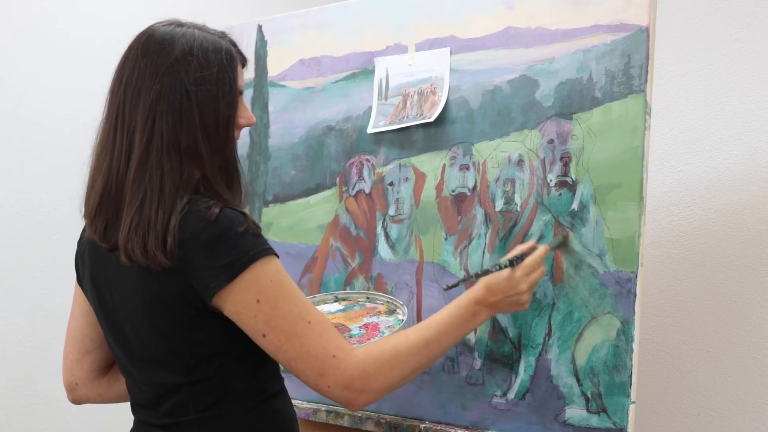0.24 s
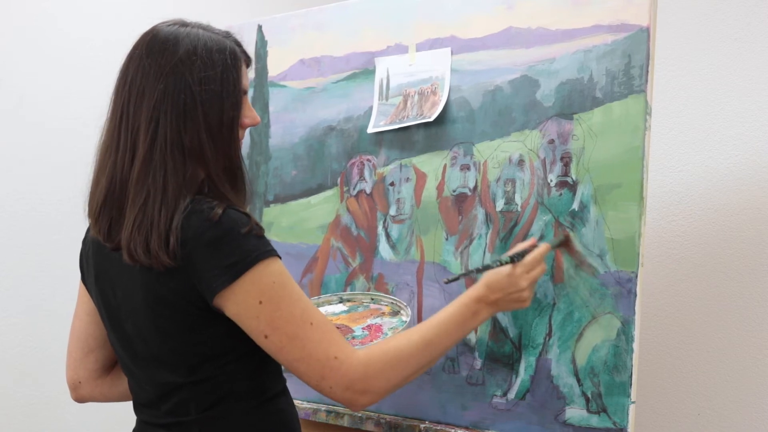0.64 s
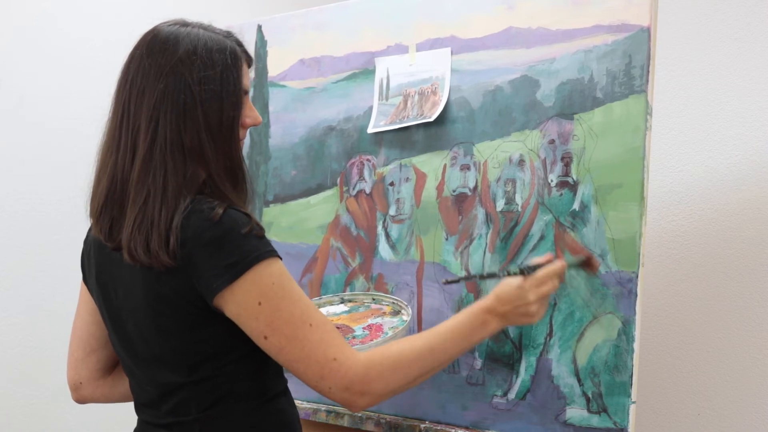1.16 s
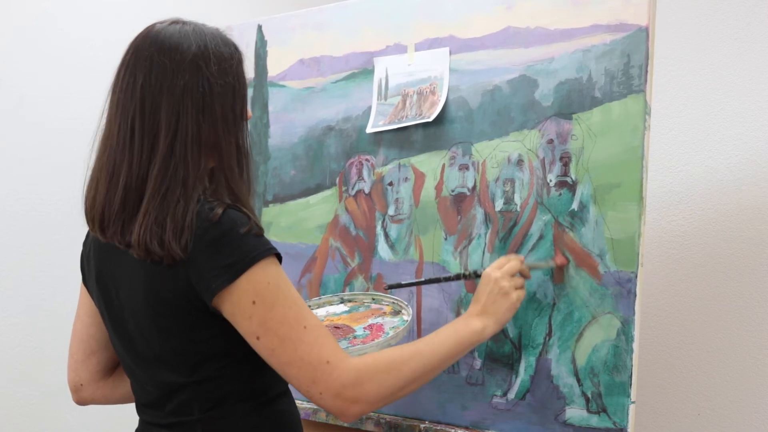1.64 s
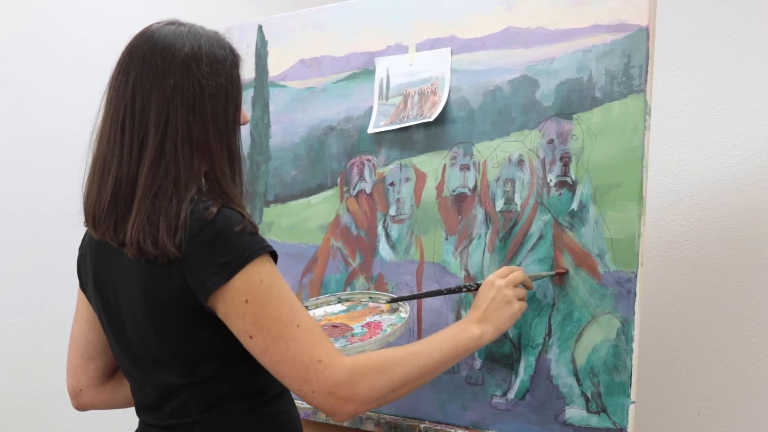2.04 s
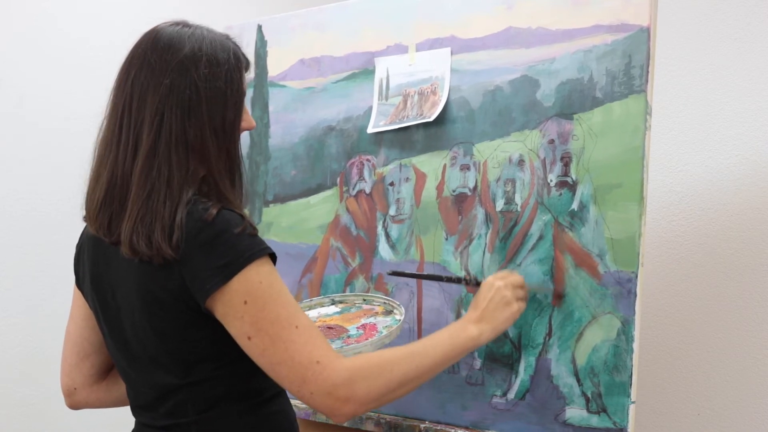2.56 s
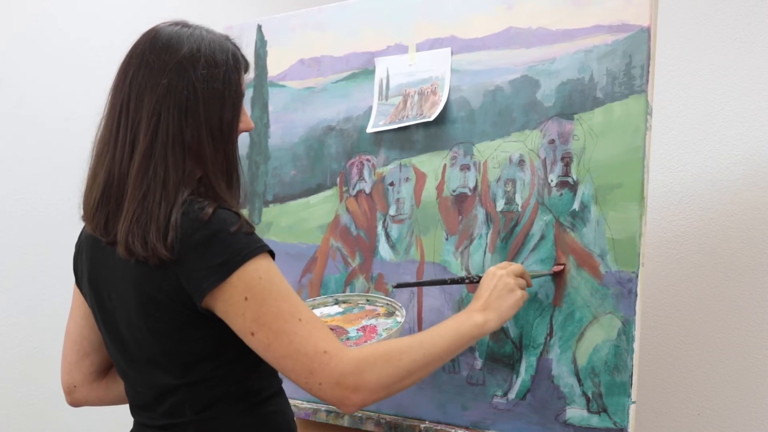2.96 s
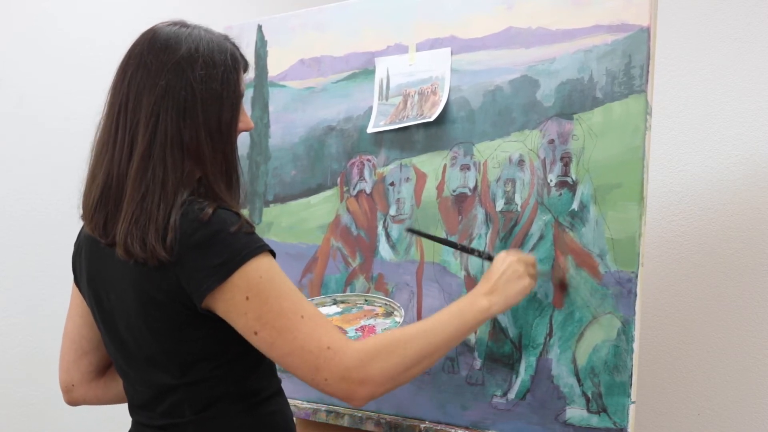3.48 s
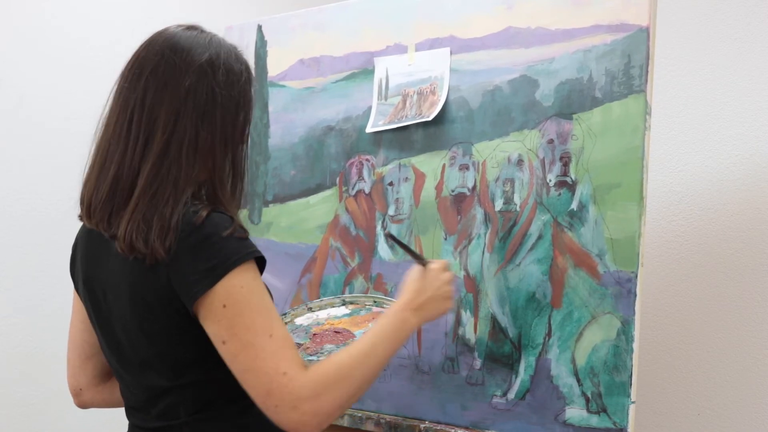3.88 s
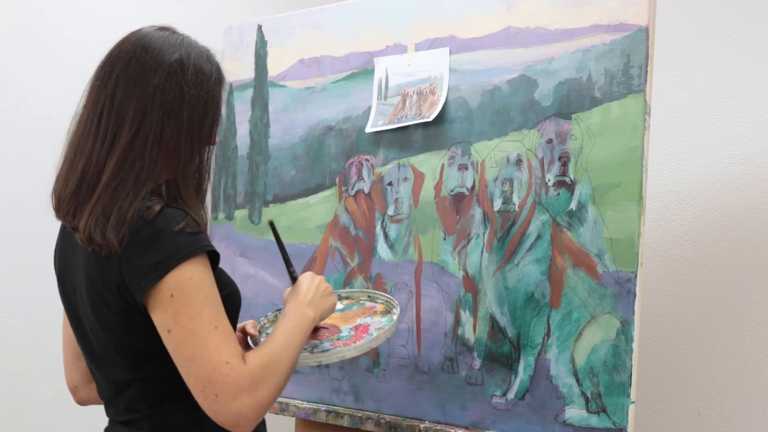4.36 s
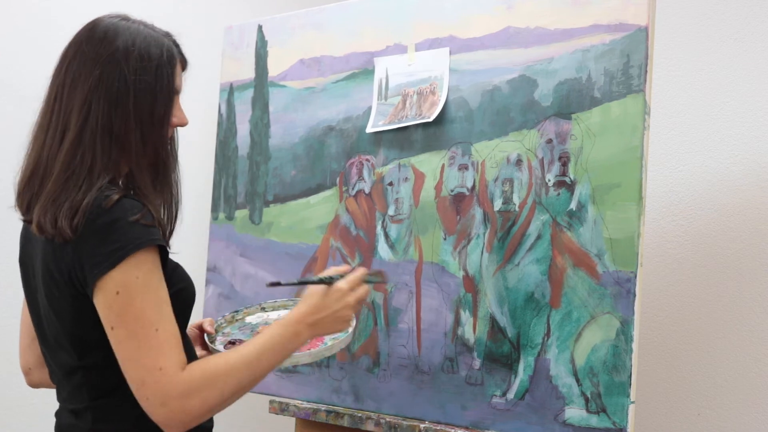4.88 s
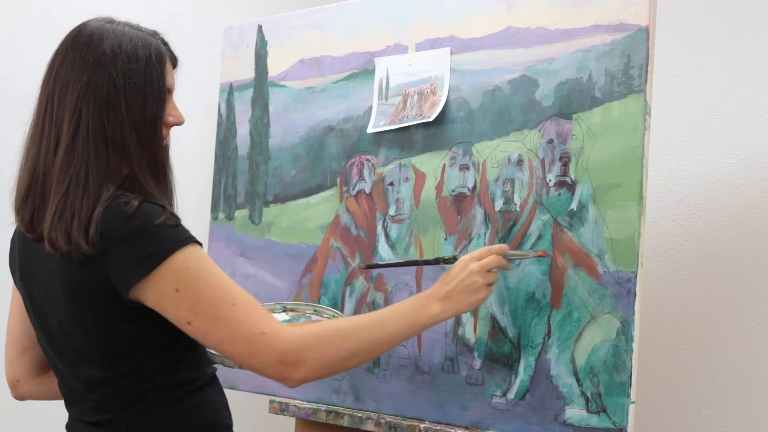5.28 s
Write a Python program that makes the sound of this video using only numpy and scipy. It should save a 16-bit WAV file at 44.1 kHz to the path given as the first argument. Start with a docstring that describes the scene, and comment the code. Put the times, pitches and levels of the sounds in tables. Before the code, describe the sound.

A paintbrush rubs over a stretched canvas in quick, uneven strokes. The bristles hiss and sometimes rasp, while the canvas hums and thumps softly like a slack drum where they land. The strokes stop, clothes rustle faintly, and the brush dabs sticky paint on a palette. A few handle ticks and one last stroke follow. The microphone is close, in a small, quiet studio with low rumble.

```python
"""Bristles hiss in short strokes over a stretched canvas, close to one microphone in a small, quiet studio.
They catch and slip on the weave; the canvas hums under them and thumps like a slack drum where they land.
The brush then dabs sticky paint on a hand-held palette and goes back for one more stroke.
Its handle ticks and clothes rustle as the arm moves, over low room rumble and faint microphone hiss."""
import sys
import numpy as np
from scipy import signal
from scipy.fft import rfft, irfft
from scipy.io import wavfile

SR = 44100
rng = np.random.default_rng(int(sys.argv[2]) if len(sys.argv) > 2 else 0)


def wav_out(sig):
    """Save sig, one row per channel (or a flat mono array), as 16-bit PCM at SR to the path in sys.argv[1]."""
    wavfile.write(sys.argv[1], SR, np.round(np.clip(np.atleast_2d(sig).T, -1, 1) * 32767).astype(np.int16))


N = 243431
TIME = np.arange(N) / SR

# pushes of the brush: start_s, length_s, fastest_point (0-1), peakedness, hiss_db, hum_db, drum_db
BRUSH_STROKES = [(0.0, 0.073, 0.9, 1.3, -56.5, -84, -65), (0.113, 0.065, 0.66, 1.2, -50, -47, -50),
                 (0.167, 0.085, 0.23, .7, -54, -54, -51), (0.245, 0.14, 0.07, 0.57, -51, -47, -49),
                 (0.304, 0.16, 0.44, 1.1, -47, -59, -54), (0.445, 0.045, .5, 1.05, -54, -51.5, -64),
                 (0.543, 0.026, 0.34, 1.2, -54.5, -51, -60), (0.595, 0.26, 0.66, 1.03, -50, -50, -47),
                 (0.879, 0.17, 0.4, 0.93, -46.5, -54, -55), (1.012, 0.041, 0.74, 1.5, -55, -47, -50),
                 (1.054, 0.28, 0.47, 0.83, -48.5, -51, -48), (1.309, 0.099, 0.63, 0.59, -51.5, -60, -63),
                 (1.386, 0.12, 0.47, 1.2, -48.5, -52.5, -55), (1.507, 0.11, .68, 0.66, -51.5, -59, -60),
                 (1.647, 0.16, 0.35, 0.71, -50, -53.5, -54), (1.796, 0.12, 0.6, 0.81, -53.5, -61, -57.5),
                 (1.977, 0.16, 0.2, .7, -55.5, -60, -56), (2.129, 0.17, 0.66, 1.1, -52, -52.5, -55.5),
                 (2.289, 0.24, 0.66, 0.63, -49.5, -51, -46.5), (2.529, 0.14, 0.63, 0.66, -50.5, -59.5, -58),
                 (2.639, 0.072, 0.54, 0.58, -50, -52.5, -56), (2.725, 0.12, 0.47, 1, -56, -54.5, -60),
                 (2.826, 0.25, 0.83, .6, -65, -62, -55), (3.183, 0.25, 0.75, 1.7, -52.5, -50, -45.5),
                 (3.467, 0.14, .36, 0.76, -47, -50.5, -45), (3.616, 0.11, 0.45, 1.1, -47.5, -57.5, -53.5),
                 (5.461, 0.071, 0.36, 1.1, -56, -49, -47.5)]
# spectrum of bristles flicking over the weave: frequency_hz, density_db
BRISTLE_SPECTRUM = [(300, -6), (1000, 0.5), (1400, -4.5), (1750, -0.5), (2000, -2.5), (2400, 1.5),
                    (3300, -4.5), (4200, -2.5), (4900, -1.5), (5500, -5.5), (6300, -3), (7200, -5.5),
                    (10500, -5), (16000, -16)]
# spectrum of the canvas around the brush: frequency_hz, density_db
HUM_SPECTRUM = [(200, -16), (400, -10.5), (500, 0.5), (570, 2), (700, -7), (1000, -10.5), (1400, -35),
                (3000, -31.5)]
# spectrum of the whole canvas as a drum: frequency_hz, density_db
DRUM_SPECTRUM = [(50, -2.5), (140, -8.5), (190, -2), (230, 1.5), (280, -4), (380, -12), (700, -37)]
# stiff bristles chattering: start_s, end_s, pitch_hz, level_db
BRISTLE_RASPS = [(0, 0.082, 6450, -64.5), (0.326, 0.407, 2520, -58), (0.347, 0.424, 6100, -56.5),
                 (0.622, 1.35, 6530, -65), (1.535, 1.617, 4120, -58.5), (1.666, 1.76, 4030, -55),
                 (1.8, 1.9, 3920, -63), (2.638, 2.706, 2830, -62), (3.486, 3.566, 4500, -54),
                 (3.498, 3.582, 6300, -56)]
# course of the low room rumble: time_s, level_db
RUMBLE_LEVELS = [(0, -57.5), (.7, -53.5), (1.6, -51), (2.2, -55), (2.6, -48.5), (3.2, -50), (3.8, -50.5),
                 (4.9, -53.5), (5.25, -49), (5.52, -44)]
# spectrum of that rumble: frequency_hz, density_db
RUMBLE_SPECTRUM = [(15, -6.5), (28, -9.5), (37, 5.5), (50, -10), (70, -10.5), (100, -13.5), (150, -20.5),
                   (260, -26), (600, -51)]
# spectrum of room air and microphone hiss: frequency_hz, density_db
AIR_SPECTRUM = [(100, -4), (300, -9), (500, -7.5), (900, -7.5), (1400, -11.5), (2300, -11), (4000, -18),
                (8000, -21.5), (12300, -22.5), (13200, -15.5), (14100, -19), (14600, -24), (16000, -28)]
# reverberation of the studio: frequency_hz, t60_s
STUDIO_DECAY = [(100, 0.64), (500, 0.64), (2000, 0.58), (10000, 0.15)]
# the brush lands on the canvas: time_s, blow_db, contact_ms, snap_db
CANVAS_LANDINGS = [(.2512, -22, 0.56, -36), (.467, -34, 2.7, -65), (.9043, -36.5, 0.46, -39.5),
                   (.9085, -21, 5.5, -60), (1.674, -22, 5.7, -57), (2.577, -21.5, 2.9, -51),
                   (3.485, -42, 0.66, -39.5), (3.488, -15, 1.84, -58), (3.4925, -23, 2.9, -60),
                   (3.648, -24, 3.55, -62)]
# modes of the canvas on its frame: pitch_hz, gain_db, t60_s
CANVAS_RESONANCES = [(37.8, -18.5, 0.25), (63, -9, 0.096), (96, -9.5, 0.046), (192, -5, 0.041),
                     (232, 3.5, 0.04), (294, -1, 0.013), (525, 3.5, 0.024), (603, -28, 0.059),
                     (742, -4, 0.038), (896, -1.5, 0.032)]
# ticks of the brush handle: time_s, level_db
HANDLE_TICKS = [(.547, -36), (5.247, -33), (5.4095, -30.5), (5.5, -32)]
# moves of the arm: start_s, length_s, rustle_db
ARM_MOVES = [(2.702, 0.56, -64.5), (3.729, 0.15, -65), (3.87, 0.25, -67), (4.044, 0.17, -60.5),
             (4.689, 0.22, -64), (5.08, 0.5, -56.5)]
# spectrum of rubbing cloth: frequency_hz, density_db
CLOTH_SPECTRUM = [(71, -41), (120, -11), (396, -0.5), (561, -10), (961, -7), (1620, -17), (2040, -13),
                  (3000, -25), (3360, -19), (12000, -51), (15600, -68), (22000, -120)]
# the brush knocks on the palette: time_s, blow_db, contact_ms, snap_db
PALETTE_DABS = [(4.1668, -44, 0.22, -45), (4.1757, -37, 0.21, -47.5), (4.1817, -29, 0.57, -56),
                (4.1857, -53, 1, -59), (4.386, -46.5, 0.46, -46), (4.3925, -35, 0.93, -44),
                (4.557, -19, 0.68, -40.5)]
# modes of the palette: pitch_hz, gain_db, t60_s
PALETTE_RESONANCES = [(48, -14, 0.22), (101, -2, 0.048), (165, -9, 0.066), (511.5, 6, 0.044),
                      (616, -20, 0.22), (692, -33, 0.31), (739, 1.5, 0.054), (800, -24, 0.48),
                      (1276, -6, 0.039), (1920, 5.5, 0.02), (2045, 4.5, 0.017), (3610, 7.5, .034),
                      (5100, -1, 0.05)]
# bristles work the paint on the palette: start_s, length_s, squelch_db
PAINT_MIXING = [(4.167, 0.166, -46.5), (4.387, 0.11, -49.5), (4.553, 0.104, -52.5)]
# spectrum of wet paint: frequency_hz, density_db
PAINT_SPECTRUM = [(200, 5), (500, 11), (1050, 4.5), (1500, 6.5), (2200, 3.5), (4000, -1), (5800, -1),
                  (7500, 1), (10000, 0), (13000, -7.5), (16000, -4.5)]
# threads of paint snap: time_s, level_db, band_hz
THREAD_SNAPS = [(4.247, -30, 11000), (4.271, -37, 9500), (4.275, -35, 9000), (4.315, -39, 8000),
                (4.41, -37, 6000), (4.4395, -47, 9000), (4.464, -32.5, 7500), (4.49, -40, 9100),
                (4.576, -34.5, 12000), (4.6477, -42, 11100)]


def gain_of(db):
    return 10 ** (np.asarray(db) / 20)


def unit_rms(x):
    return x / np.sqrt(np.mean(x ** 2) + 1e-20)


def value_at(points, hz):
    """Reads a table on a log-frequency axis."""
    table_hz, values = np.transpose(points)
    return np.interp(np.log(hz + 1), np.log(table_hz + 1), values)


def add(mix, start_s, sound):
    part = mix[max(round(start_s * SR), 0):][:len(sound)]
    part += sound[:len(part)]


def coloured(x, spectrum):
    """Filters x by a spectrum and scales it to rms 1."""
    hz = np.fft.rfftfreq(len(x), 1 / SR)
    return unit_rms(irfft(rfft(x) * gain_of(value_at(spectrum, hz)), len(x)))


def band(x, low_hz, high_hz):
    sos = signal.butter(2, [low_hz, min(high_hz, SR / 2 - 100)], "band", fs=SR, output="sos")
    return signal.sosfilt(sos, x)


def grains(count, per_s, spread_db):
    """Random tiny impulses of uneven size, at rms 1."""
    size = gain_of(spread_db * np.minimum(rng.exponential(1, count), 4))
    return unit_rms(size * rng.choice([-1, 1], count) * (rng.random(count) < per_s / SR))


def flutter(count, hz, depth_db):
    """A factor near 1 that wavers at rates up to hz, repeating each second."""
    slow = rfft(rng.standard_normal(SR)) / (1 + (np.fft.rfftfreq(SR, 1 / SR) / hz) ** 4)
    return gain_of(depth_db * np.resize(unit_rms(irfft(slow, SR)), count))


def arch(start_s, length_s, peak_at, peakedness):
    """One push rises from 0 to 1 and falls back to a stop."""
    peak_s = start_s + length_s * np.clip(peak_at, 0.05, 0.95)
    phase = np.interp(TIME, [start_s, peak_s, start_s + length_s], [0, 0.5, 1])
    return (4 * phase * (1 - phase)) ** peakedness


def stroke_levels(pressure_lead=0.03):
    """Levels in dB: hiss follows the speed of each push, hum and drumming its slightly earlier pressure."""
    power = np.full((3, N), 1e-10)
    for start_s, length_s, fastest, peakedness, hiss_db, hum_db, drum_db in BRUSH_STROKES:
        speed = arch(start_s, length_s, fastest, peakedness)
        pressure = arch(start_s, length_s, fastest - pressure_lead, peakedness)
        power[0] += (gain_of(hiss_db) * speed) ** 2
        power[1] += (gain_of(hum_db) * pressure) ** 2
        power[2] += (gain_of(drum_db) * pressure) ** 2
    return 10 * np.log10(power)


def bristle_hiss(level_db, grip, knee_db=-43.5, treble_hz=8000):
    """Bristles catch and slip on the weave; a faster stroke is louder and brighter."""
    slips = grains(N, per_s=16000, spread_db=2.0) * grip
    # the canvas mirrors the hiss, with a delay that shifts as the brush tilts
    delay_s = 0.001148 * flutter(N, hz=1.73, depth_db=2.5)
    mirrored = np.interp(TIME - delay_s, TIME, slips)
    hiss = coloured(slips + 0.38 * mirrored, BRISTLE_SPECTRUM)
    hz = np.fft.rfftfreq(N, 1 / SR)
    treble = irfft(rfft(hiss) / (1 + (treble_hz / (hz + 1)) ** 6), N)
    treble_gain = gain_of(0.58 * (level_db - knee_db))  # duller the further below the knee
    return gain_of(level_db) * (hiss + treble * (treble_gain - 1))


def canvas_hum(hum_db, drum_db, grip):
    """Tugging bristles make the canvas hum around the brush and drum as a whole."""
    tugs = grains(N, per_s=2500, spread_db=2.5) * grip
    hum = coloured(tugs, HUM_SPECTRUM)
    drum = coloured(tugs, DRUM_SPECTRUM)
    # the pitch of the drumming shifts as the brush travels over the canvas
    position = np.cumsum(flutter(N, hz=6.054, depth_db=0.72))
    bent_drum = np.interp(position % N, np.arange(N), drum)
    return gain_of(hum_db) * hum + gain_of(drum_db) * bent_drum


def brush_strokes():
    """One unsteady grip on the weave drives both the bristles and the canvas."""
    hiss_db, hum_db, drum_db = stroke_levels()
    grip = flutter(N, hz=112, depth_db=0.36)
    return bristle_hiss(hiss_db, grip) + canvas_hum(hum_db, drum_db, grip)


def bristle_rasps():
    """Stiff bristles chatter: a fuzzy pitch with a weak octave."""
    out = np.zeros(N)
    for start_s, end_s, hz, db in BRISTLE_RASPS:
        slips = grains(round((end_s - start_s) * SR), per_s=10000, spread_db=-3)
        chatter = band(slips, hz - 240, hz + 240) + 0.36 * band(slips, 2 * hz - 550, 2 * hz + 550)
        add(out, start_s, gain_of(db) * unit_rms(chatter) * signal.windows.tukey(len(slips), 0.5))
    return out


def room_tone(air_db=-58):
    """Lumpy low rumble under steady air and microphone hiss."""
    rumble_db = np.interp(TIME, *np.transpose(RUMBLE_LEVELS))
    rumble = gain_of(rumble_db) * coloured(rng.standard_normal(N), RUMBLE_SPECTRUM)
    rumble *= flutter(N, hz=11, depth_db=2.0)
    return rumble + gain_of(air_db) * coloured(rng.standard_normal(N), AIR_SPECTRUM)


def studio_walls(x, echoes_per_s=2500, gap_s=0.007):
    """Sparse reflections follow the direct sound to the microphone, each band dying at its own rate."""
    echoes = rng.choice([-1., 1.], SR) * (rng.random(SR) < echoes_per_s / SR) * (TIME[:SR] > gap_s)
    hz, t, bands = signal.stft(echoes, SR, nperseg=256)
    decay = gain_of(-60 * t / value_at(STUDIO_DECAY, hz)[:, None])
    tail = signal.istft(bands * decay, SR, nperseg=256)[1]
    return signal.fftconvolve(x, tail / np.linalg.norm(tail))[:N]


def brush_blows(blows, modes, snap_s, scuff_db):
    """A soft push rings canvas or palette (longer contact is duller); splaying bristles puff and scuff."""
    t, out = np.arange(SR // 2) / SR, np.zeros(N)
    ring = sum(gain_of(db - 60 * t / t60_s) * np.cos(2 * np.pi * hz * t) for hz, db, t60_s in modes)
    lead_s = 0.02  # time for the push to build before its peak
    age_s = t - lead_s
    for time_s, blow_db, contact_ms, snap_db in blows:
        push = np.exp(-2 * (age_s * 1000 / contact_ms) ** 2)
        splay = np.clip(age_s / 0.0015, 0, 1) * np.exp(-abs(age_s) / snap_s)
        puff = gain_of(snap_db) * coloured(rng.standard_normal(len(t)), PAINT_SPECTRUM) * splay
        hardness = 1 / (1 + (contact_ms / 0.53) ** 4)  # a cushioned landing hardly scuffs
        force = gain_of(blow_db) * push / push.sum() + gain_of(scuff_db) * hardness * puff
        add(out, time_s - lead_s, signal.fftconvolve(ring, force)[:len(t)] + puff)
    return out


def handle_ticks():
    """The brush handle gives brief, dull clicks."""
    t, out = np.arange(1024) / SR, np.zeros(N)
    for time_s, db in HANDLE_TICKS:
        click = np.exp(-t / 0.002) + 0.082 * rng.standard_normal(len(t)) * np.exp(-t / 0.0011)
        add(out, time_s, gain_of(db) * band(click, 170, 4800))
    return out


def clothes_rustle(ease_share=0.48):
    """Cloth rubs softly, swelling and fading as the arm speeds up and slows down."""
    out = np.zeros(N)
    for start_s, length_s, db in ARM_MOVES:
        rub = coloured(grains(round(length_s * SR), per_s=5000, spread_db=3.5), CLOTH_SPECTRUM)
        add(out, start_s, gain_of(db) * rub * signal.windows.tukey(len(rub), ease_share))
    return out


def wet_paint(ease_db_per_s=55, fade_samples=90):
    """Paint crackles under the bristles as the hand eases off; single threads snap as they lift."""
    t, out = np.arange(1024) / SR, np.zeros(N)
    for start_s, length_s, squelch_db in PAINT_MIXING:
        level_db = squelch_db - ease_db_per_s * np.arange(0, length_s, 1 / SR)
        count = len(level_db)
        crackle = grains(count, per_s=3500, spread_db=0.5) * flutter(count, hz=146, depth_db=3.0)
        fade = np.minimum(np.arange(count) / fade_samples, 1)
        add(out, start_s, gain_of(level_db) * coloured(crackle, PAINT_SPECTRUM) * fade * fade[::-1])
    for time_s, db, hz in THREAD_SNAPS:
        burst = rng.standard_normal(len(t)) * np.minimum(t / 0.0019, 1) * np.exp(-t / 0.0023)
        add(out, time_s, gain_of(db) * band(burst, hz * 0.5, hz * 1.7))
    return out


def scene():
    """Mono, close to the canvas: the direct sound stands well above the walls."""
    canvas = brush_blows(CANVAS_LANDINGS, CANVAS_RESONANCES, snap_s=0.0025, scuff_db=-22)
    palette = brush_blows(PALETTE_DABS, PALETTE_RESONANCES, snap_s=0.012, scuff_db=-26)
    handwork = brush_strokes() + bristle_rasps() + wet_paint() + handle_ticks() + clothes_rustle()
    walls = studio_walls(gain_of(-15) * canvas + gain_of(-17.5) * palette + gain_of(-14) * handwork)
    return (handwork + canvas + palette + walls + room_tone())[None]


def record(dry):
    """The recorder cuts off the highest treble."""
    lowpass = signal.firwin(511, cutoff=15900, window=("kaiser", 9), fs=SR)
    return signal.oaconvolve(dry, lowpass[None], "same")


dry = scene()
out = record(dry)
wav_out(out)
```